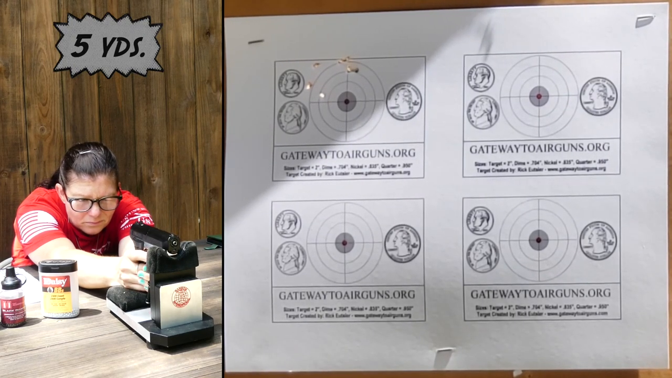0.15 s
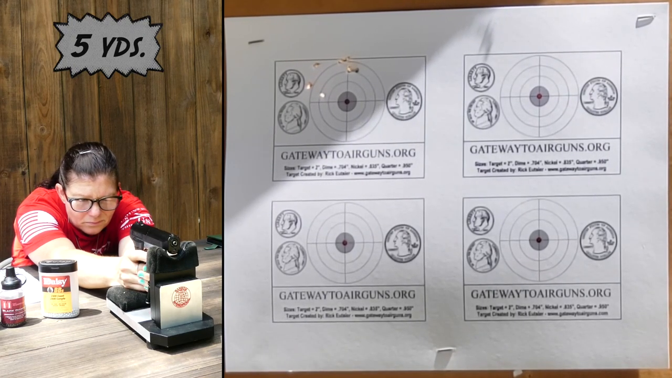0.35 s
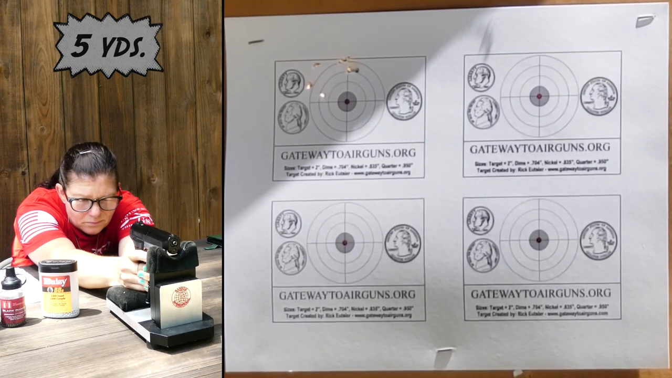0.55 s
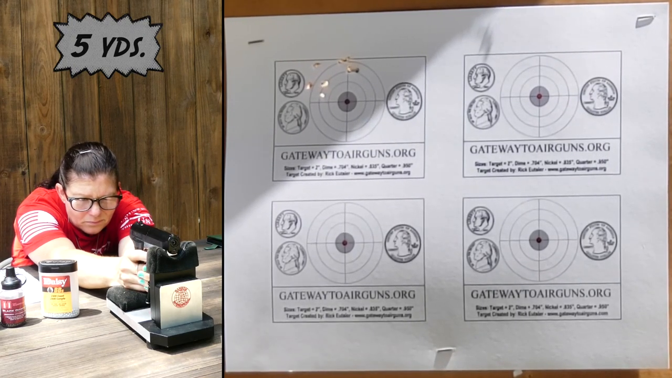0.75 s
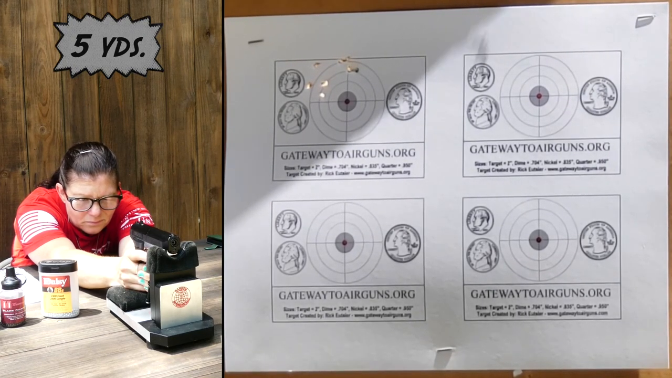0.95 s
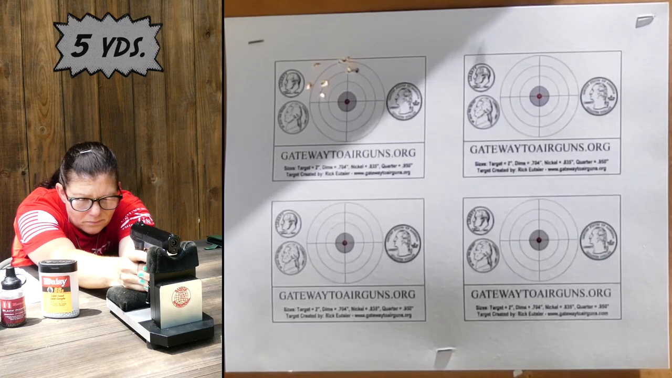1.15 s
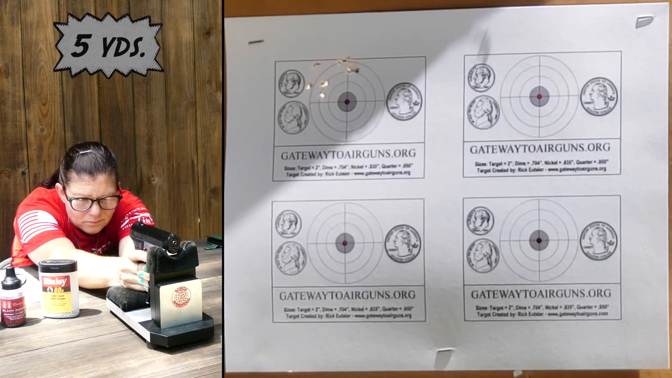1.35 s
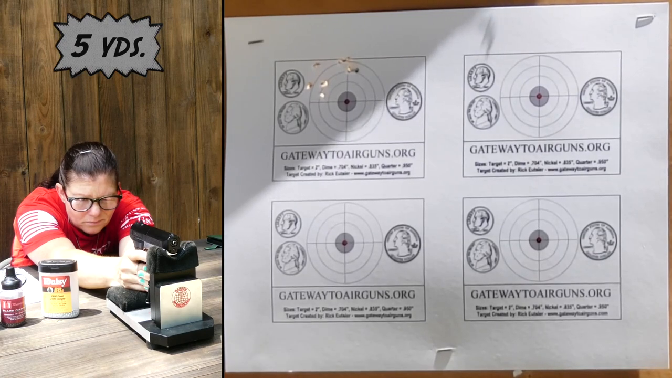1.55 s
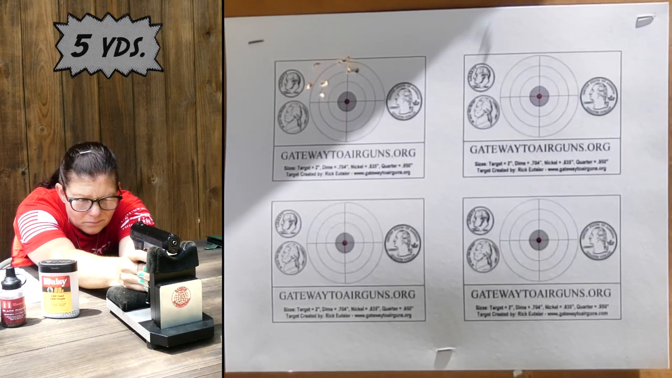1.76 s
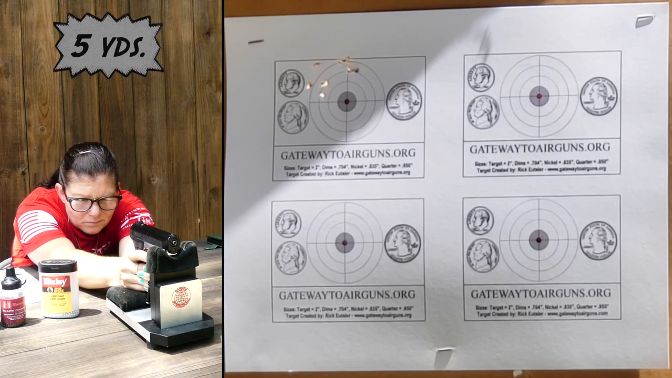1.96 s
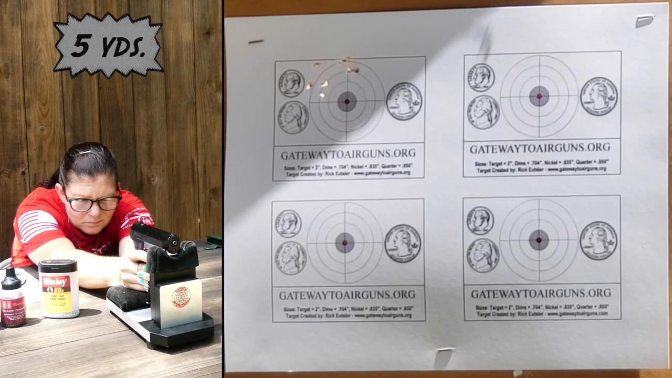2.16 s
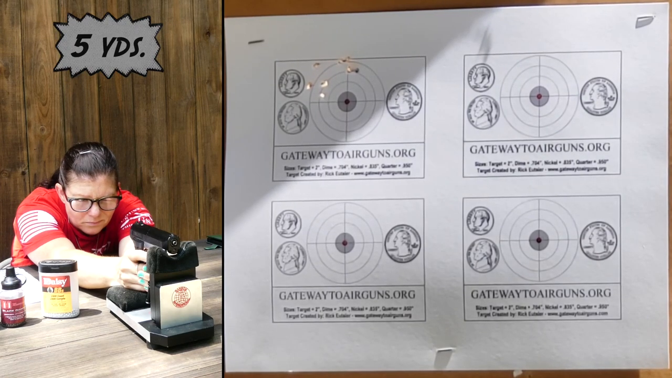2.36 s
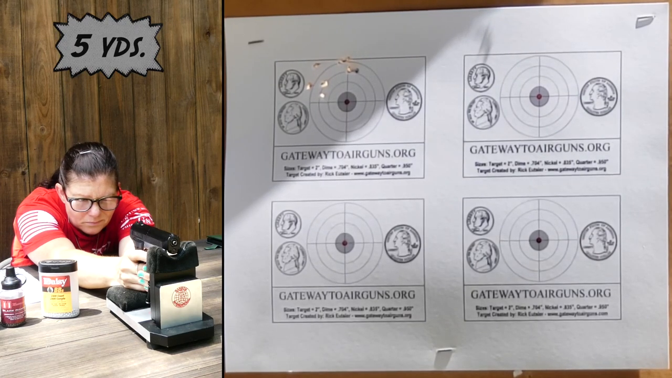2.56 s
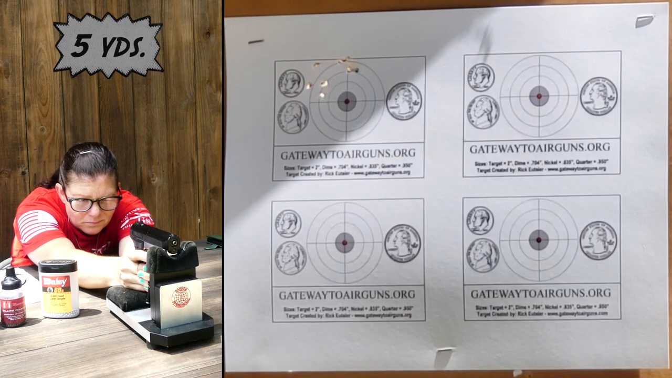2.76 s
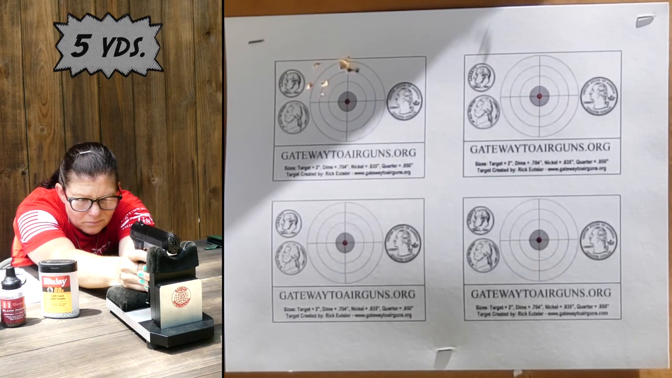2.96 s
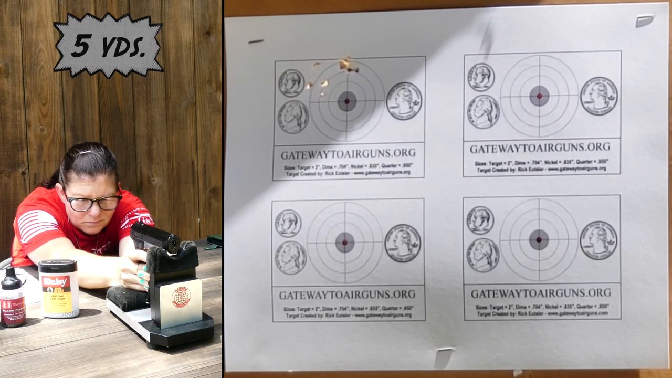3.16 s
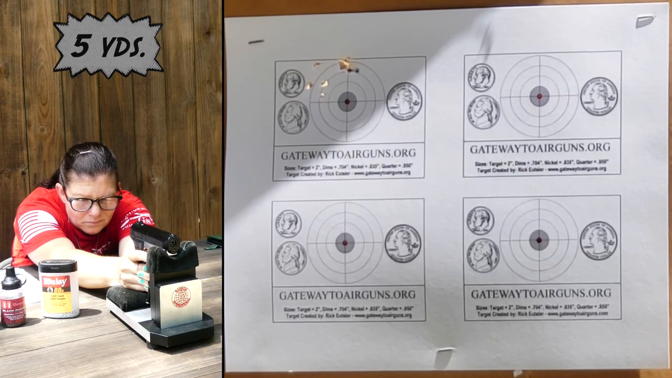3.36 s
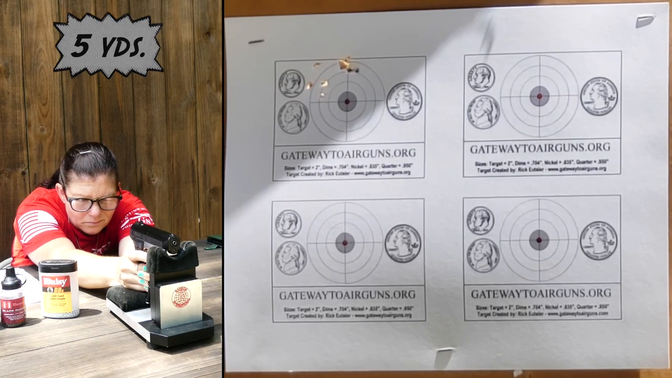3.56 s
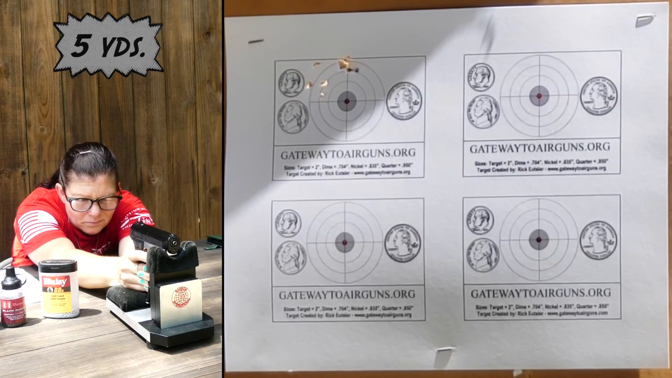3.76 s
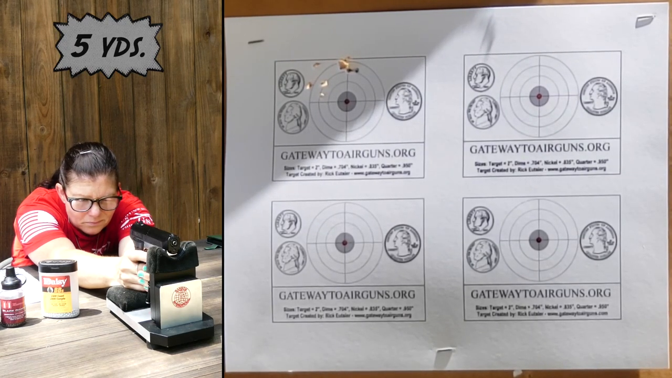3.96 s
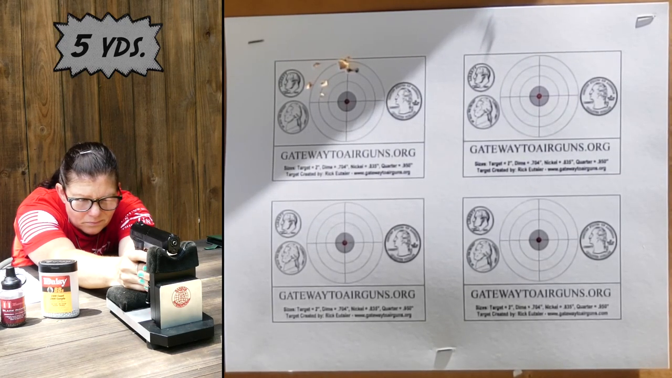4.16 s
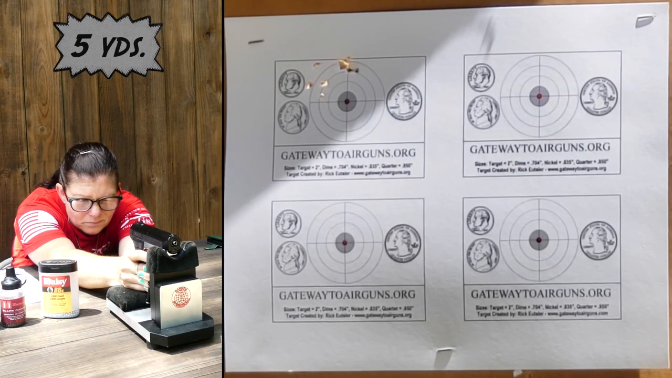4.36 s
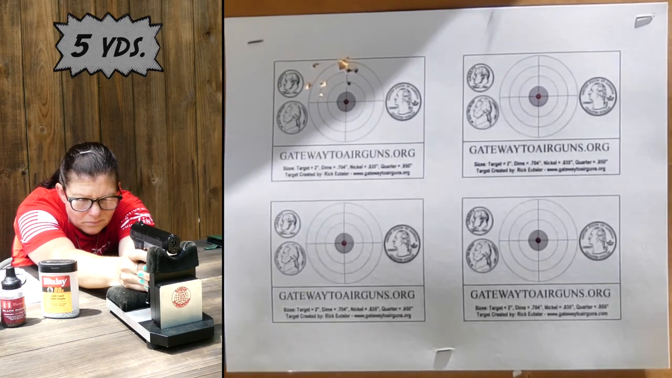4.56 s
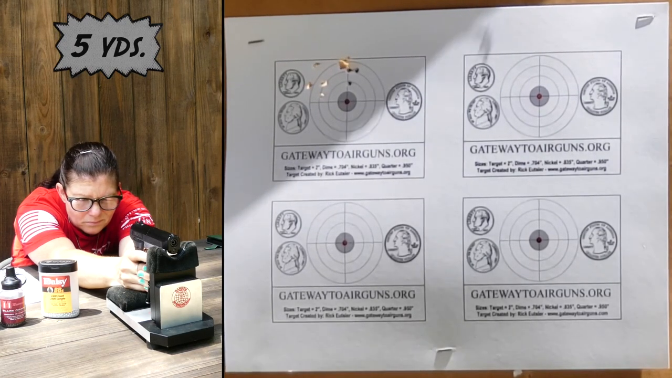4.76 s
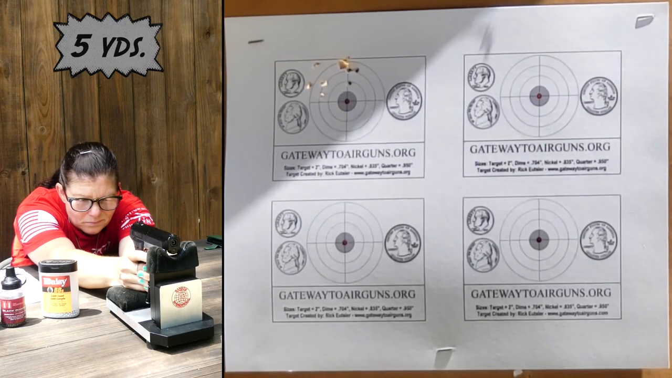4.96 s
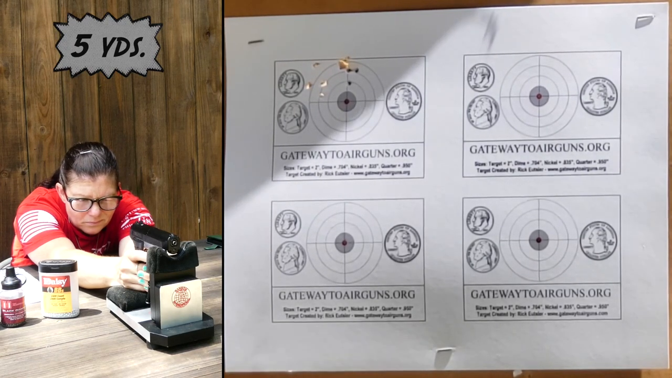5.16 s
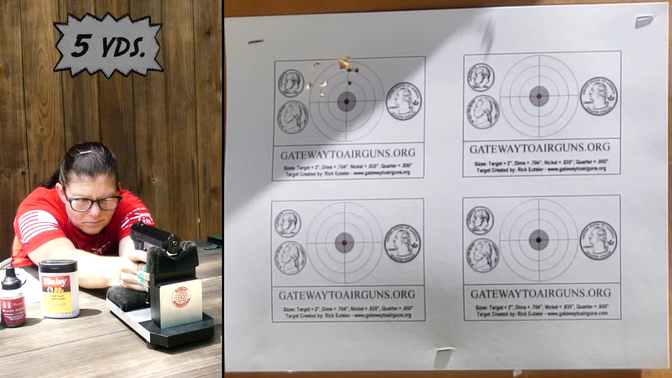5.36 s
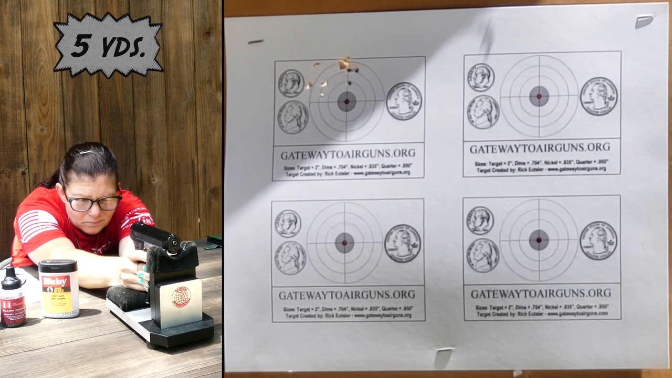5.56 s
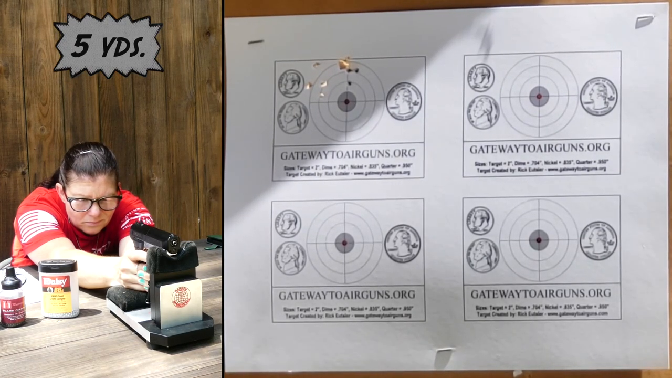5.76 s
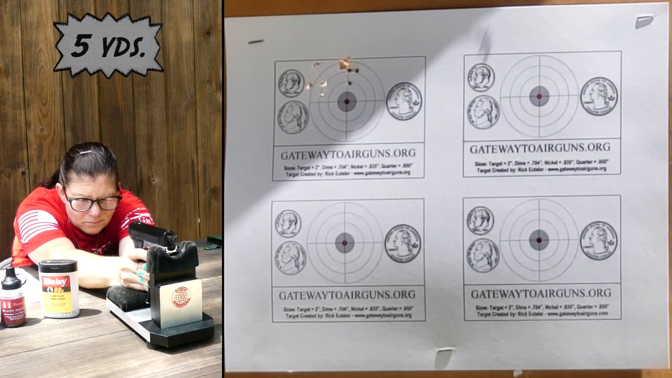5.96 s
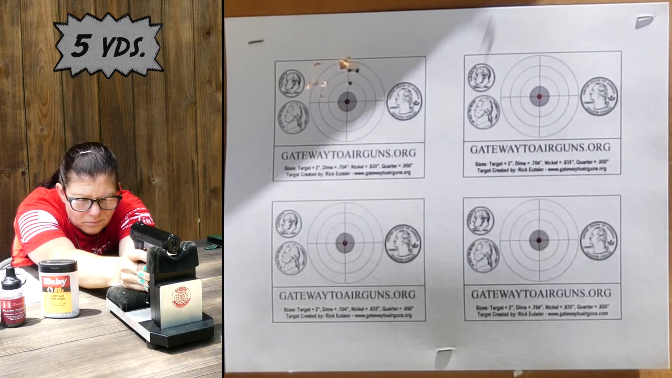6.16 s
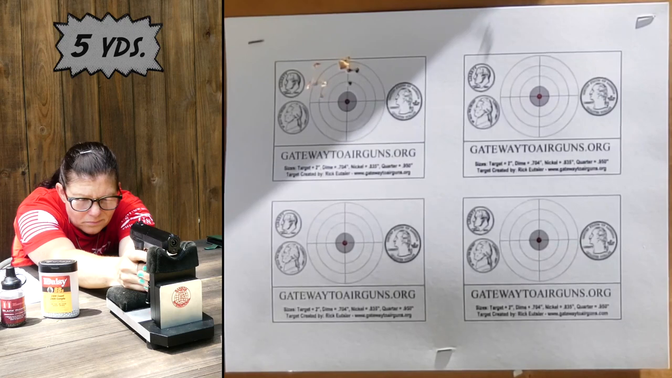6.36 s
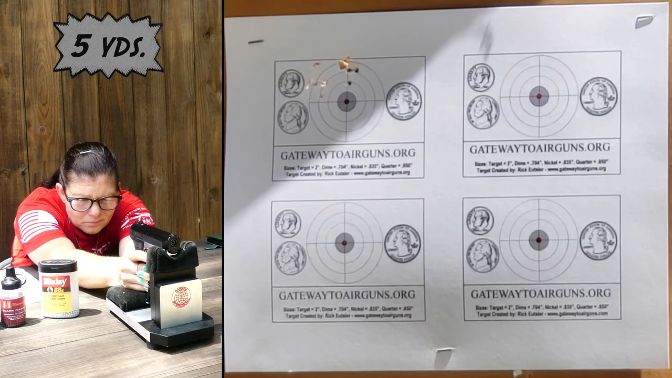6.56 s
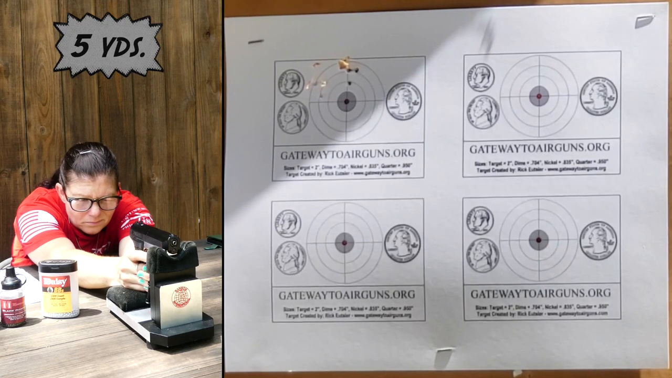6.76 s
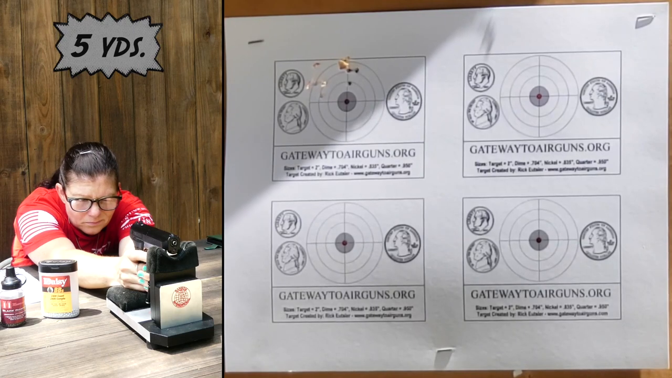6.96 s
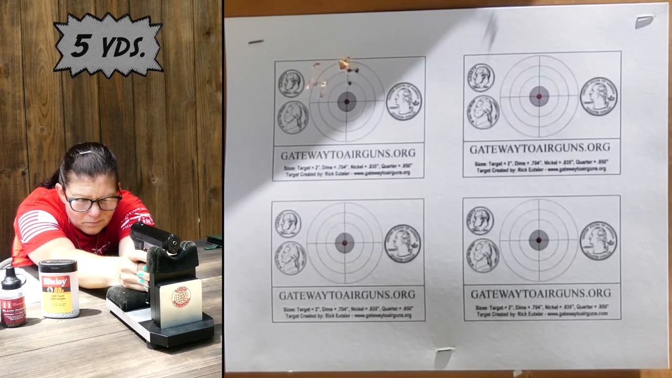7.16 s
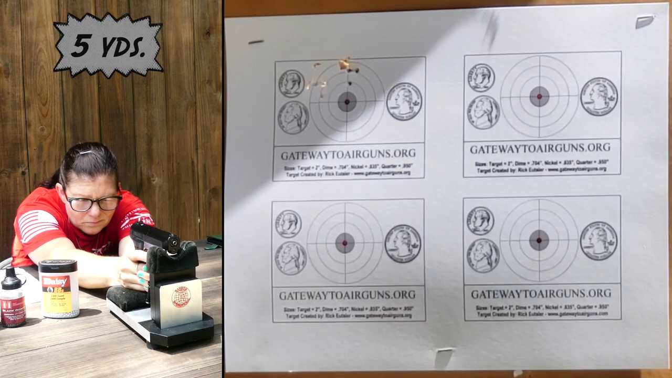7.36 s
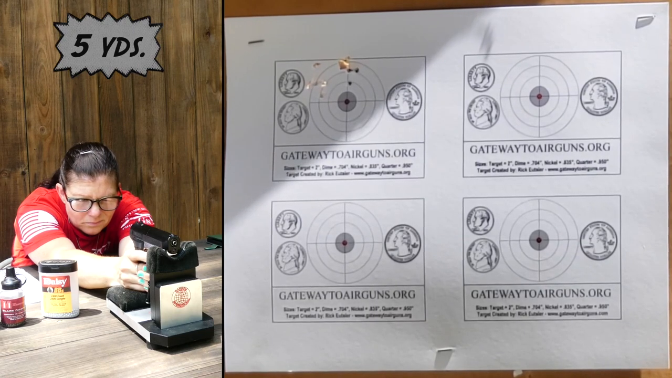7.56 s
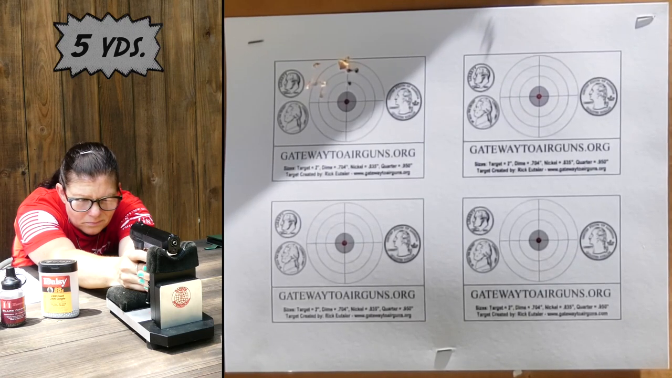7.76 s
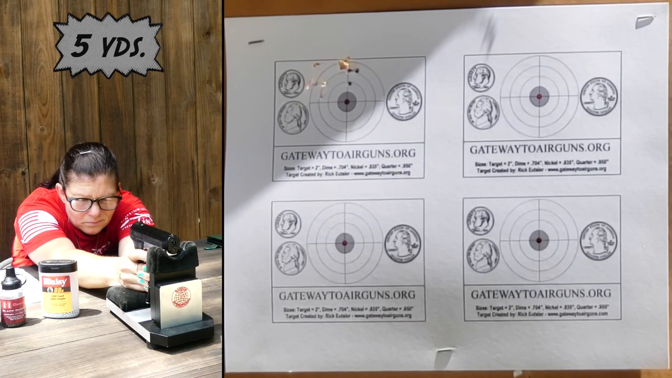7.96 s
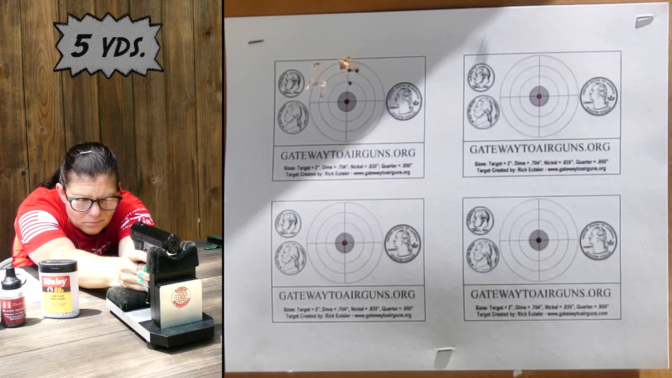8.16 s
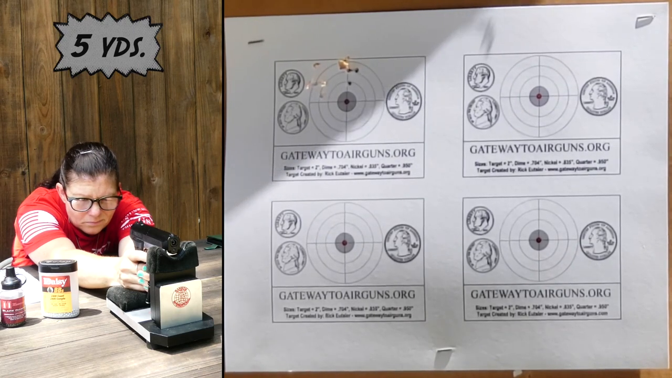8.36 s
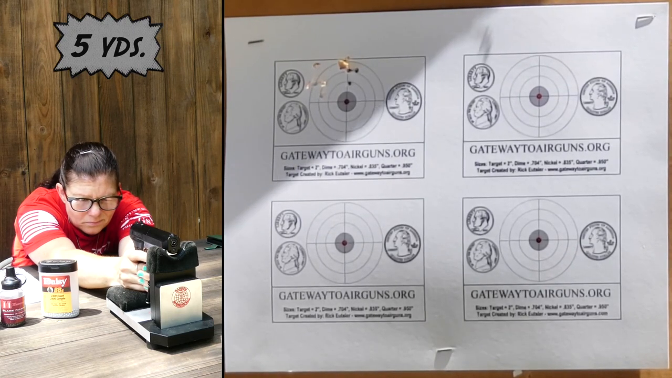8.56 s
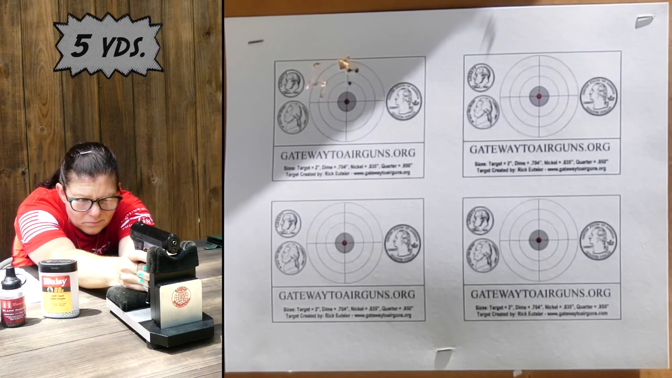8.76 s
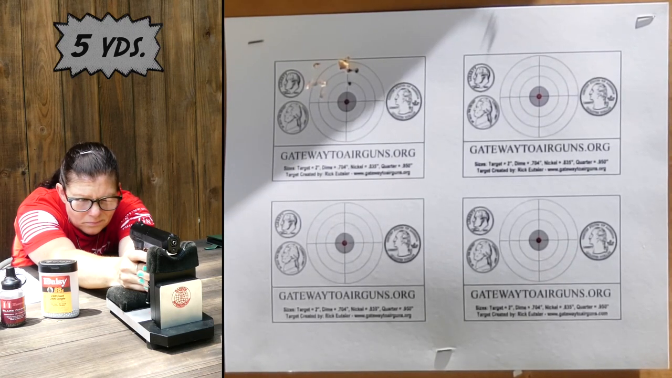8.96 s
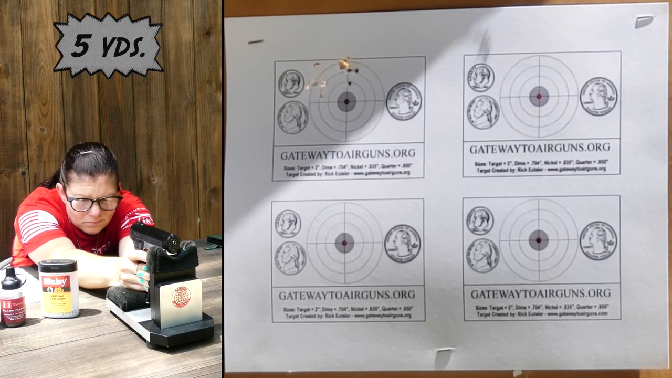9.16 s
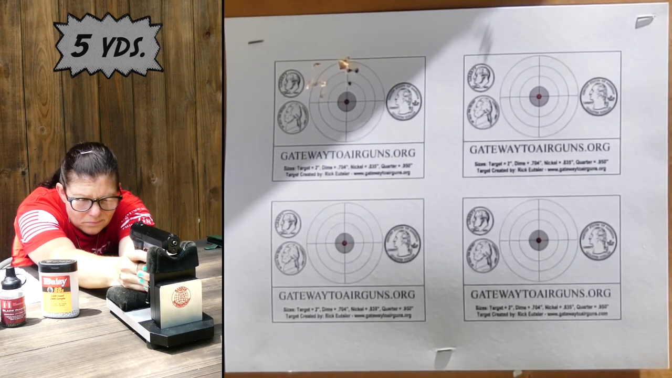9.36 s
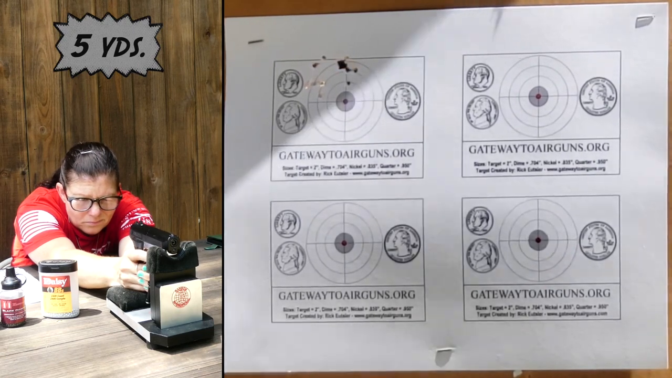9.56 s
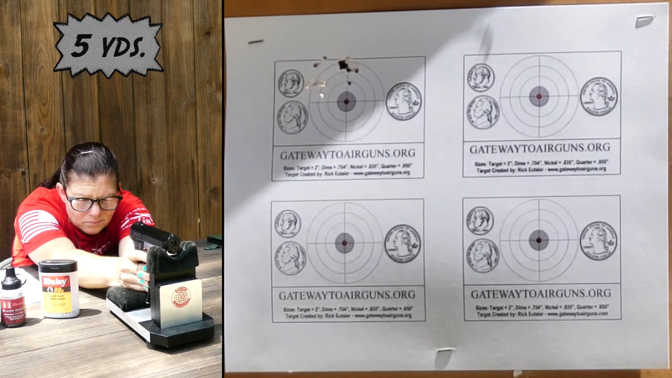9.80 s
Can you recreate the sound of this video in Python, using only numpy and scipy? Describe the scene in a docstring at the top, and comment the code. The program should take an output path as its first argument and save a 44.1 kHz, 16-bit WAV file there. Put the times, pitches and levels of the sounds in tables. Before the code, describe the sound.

Close microphones catch a semi-automatic air pistol firing six times. Every hard pop has a low thump just before it, a puff of gas hiss and a brief scattered yard echo. The ball knocks on box panels and sometimes rolls softly. Between shots come dry mechanical clacks and tiny trigger ticks, with quiet chirping birds, a thin steady insect buzz and low outdoor murmur behind.

```python
"""A gas pistol fires six times in a fenced yard, on two mixed microphones: modes crack and thud, noise hisses.
One microphone overloads with a thump, takes the crack, echoes and yard, and turns itself down after each shot;
the other catches trigger and action as noisy contacts filtered by metal resonances.
The ball knocks on ringing panels and rolls as rumbling noise in the target box.
Gliding sines make birds, a pulsed narrow buzz an insect, shaped noise the murmur of the yard."""
import sys
import numpy as np
from scipy import signal
from scipy.fft import rfft, irfft, next_fast_len
from scipy.io import wavfile

SR = 44100
rng = np.random.default_rng(int(sys.argv[2]) if len(sys.argv) > 2 else 0)


def bounce(signal):
    """Save signal as a 16-bit WAV file at the path given by the first command-line argument."""
    frames = np.transpose(np.atleast_2d(signal))
    limited = np.clip(frames, -1, 1)
    pcm = np.round(limited * 32767).astype(np.int16)
    wavfile.write(sys.argv[1], SR, pcm)


N = 433503

# Shots: [t/s, strength/dB, ringing tone level/dB]
SHOTS = [(0.6940, 0.5, 1.5), (2.9204, 0.5, 2), (4.4440, 0.5, 2), (5.9900, 1.5, 0), (7.8744, 1.5, 1.5),
         (9.454, 1, -3)]
# Arrivals of the blast off ground, fence and walls:
# [delay t/s, crack level/dB, thud level/dB, hiss level/dB, hiss t60/s]
ARRIVALS = [(0, -4.5, -7, 3, 0.015), (.0035, -33, -2, -6, 0.014), (.0084, -37, -12.5, -7, 0.04),
            (0.0116, -55, -14.5, -23.5, 0.071), (0.019, -47, -52, -14.5, 0.067),
            (0.033, -32, -34, -31.5, 0.065), (0.043, -25, -27, -21.5, 0.033), (.052, -18, -51, -26, 0.2),
            (0.0665, -17, -51, -9.5, 0.036), (0.074, -14, -50, -31, 0.24)]
# Modes of the crack: [f/Hz, level/dB, t60/s]
CRACK_MODES = [(1596, 5.5, 0.011), (2700, -22, 0.0047), (6860, -26, 0.0074)]
# Modes of the thud: [f/Hz, level/dB, t60/s]
THUD_MODES = [(320, -2, 0.011), (496, -8.5, 0.045)]
# Relative spectrum of the gas hiss: [f/Hz, level/dB per Hz]
HISS = [(180, -19), (300, -6), (562, -6), (781, -4), (1460, 2), (3010, -1), (6290, -11), (7020, -7.5),
        (11600, -17), (12800, -4)]
# Tones that swell and die within the blast: [delay t/s, f/Hz, level/dB, swell t/s]
RINGS = [(0.0185, 1444, -14.5, 0.0044), (0.0675, 1476, -25.5, 0.0051), (.048, 600, -26.5, 0.0038),
         (0.015, 6730, -22, 0.0026)]
# Relative spectrum of the yard's long answer: [f/Hz, level/dB per Hz]
TAIL = [(100, 17.5), (156, -4), (507, 2), (673, -7.5), (1030, 0.5), (2900, -2), (5200, -6), (9790, -13.5),
        (11800, -27), (12800, -60)]
# Decay of that answer before its far edge: [f/Hz, t60/s]
TAIL_T60 = [(100, 0.94), (500, 2.25), (2000, 7.9), (5000, 2.22), (12000, 1.4)]
# Low boom that swells after the blast: [f/Hz, level/dB, t60/s]
BOOM = [(47.8, -25, 0.67), (82.8, -26, 0.34)]
# Resonances of the action: [f/Hz, width/Hz of one filter pass, level/dB]
ACTION = [(1474, 350, -4), (1913, 680, 5.5), (2380, 710, -16), (2990, 430, 0), (3747, 610, 3),
          (5030, 2600, -1.5), (5950, 330, 1), (6180, 1040, -3), (8560, 2000, -8), (11100, 3800, -6.5),
          (780, 1140, -15.5)]
# Trigger lets go, tick then strike: [strike t/s, strike level/dB, tick ahead t/s, tick level/dB]
RELEASES = [(0.6527, -2.5, 0.0048, -16), (2.873, -0.5, 0.012, -15.5), (4.406, -5, 0.015, -10),
            (5.9392, -3, 0.017, -12.5), (7.8236, -5.5, 0.0165, -14), (9.408, -6, 0.019, -11.5)]
# Trigger springs back, tick, clack, bounce: [clack t/s, clack level/dB, tick ahead t/s, bounce after t/s]
RESETS = [(1.0435, -2.5, 0.0073, 0.015), (3.2826, -1, 0.0082, 0.015), (4.8127, -2, 0.0101, 0.0167),
          (6.338, -3, .0118, .0206), (8.2411, -1, 0.013, 0.023)]
# Small clicks while the trigger is drawn back: [t/s, level/dB, treble level/dB]
TAKE_UP = [(1.249, -28, -13), (1.3069, -21, -42), (1.347, -27, -18), (1.361, -25.5, -8),
           (1.461, -25.5, -14), (1.567, -22.5, -1), (1.7663, -21.5, -8), (3.457, -31.5, -17),
           (3.471, -25.5, -19), (3.52, -21.5, -41), (3.528, -31, -18), (3.563, -30, -30),
           (3.575, -24.5, -9), (3.696, -22.5, -8), (4.9798, -25.5, -13), (5.064, -29, -33),
           (5.073, -31, -30), (5.118, -23, -17), (5.126, -24, -11), (5.167, -23.5, -11), (5.181, -26, -15),
           (5.21, -15, -10.5), (5.277, -33, -19), (5.307, -35, 0), (6.5731, -29, -33), (6.676, -20.5, -20),
           (6.742, -25.5, 13.5), (7.015, -32.5, 7), (6.9021, -12, -13.5), (8.467, -31, -30),
           (8.4798, -24.5, -9), (8.57, -24, -30), (8.5764, -24, -45), (8.582, -28, -30), (8.626, -32, -20),
           (8.6832, -32, -35), (8.805, -13.5, -11.5)]
# Ball against the target box: [t/s, strength level/dB, hollow note level/dB relative to strength]
KNOCKS = [(0.8008, -15.5, -49), (0.81, -18.5, -43), (3.125, -33, -3.5), (3.141, -26, -15),
          (3.158, -28, -12), (3.192, -23.5, 1), (4.5485, -17, -31), (6.081, -14, -45), (6.119, -27, -34),
          (6.748, -18.5, -22), (6.762, -18.5, -33), (6.81, -22, -5), (8.0149, -16.5, -50),
          (8.052, -24, -37), (9.496, -15.5, -35), (9.55, -13, -31), (9.584, -28, -22)]
# Panel modes of the box: [f/Hz, level/dB, t60/s]
BOX = [(496, -10, 0.089), (583, -7, 0.045), (680, -10.5, .03), (960, -14, 0.017), (1480, -3, 0.011),
       (2270, -9, 0.01)]
# Ball rolling in the box: [loudest t/s, level/dB, swell t/s, fade t/s]
ROLLS = [(3.58, -45.5, 0.49, 0.46), (7.02, -44, 0.5, 0.54), (8.9, -55, 0.55, 0.59), (9.8, -54, 0.28, .4)]
# Relative spectrum of the rolling rumble: [f/Hz, level/dB per Hz]
RUMBLE_COLOUR = [(120, -4.5), (260, 7), (360, -1), (520, 10), (680, 0.5), (1000, -2), (1500, -24)]
# Relative spectrum of the yard murmur: [f/Hz, level/dB per Hz]
YARD = [(12, -33), (20, 6.5), (86, -2), (188, -11), (498, -10), (789, -15.5), (1640, -18.5), (2590, -23.5),
        (3780, -26.5), (7230, -33), (9000, -36.5), (11400, -40), (12800, -21.5)]
# Bird phrase, a list of points for each of four notes: [t/s, f/Hz, level/dB]
PHRASE = [
    [(-.04, 1699, -18), (-.022, 1780, -12), (-.01, 2228, 1.5), (0, 2408, 3.5), (.012, 2160, 0),
     (.025, 1960, -12)],
    [(.085, 2300, 3), (.1, 2400, -1.5), (.115, 2620, 11)],
    [(.132, 3090, 6), (.143, 2688, 4), (.165, 3170, 0.5), (.195, 2600, -3)],
    [(.052, 3800, -1), (.075, 2930, -3)],
]
# Phrases sung: [t/s, level/dB, first note pitch factor, first note level/dB, upper notes level/dB]
SONG = [(1.204, -49.5, 1, -25, 2.5), (1.461, -40.5, 0.99, -3.5, -4), (1.717, -43, 1.06, -1.5, -0.5),
        (1.978, -40, 1.0, -8, -5.5), (2.239, -46, 1.05, -0.5, -7.5), (2.488, -42, 1.06, -5, -7.5),
        (6.595, -50, 1, -25, 5), (6.846, -48, 1, 0, -1), (7.097, -44, 0.96, -5, -4.5),
        (7.35, -45.5, 0.93, -2.5, 1.5), (7.597, -45.5, 0.98, -3, -3)]
# Far whistles of other birds: [t/s, length/s, first f/Hz, last f/Hz, level/dB]
WHISTLES = [(.03, 0.085, 1690, 1540, -53), (.048, 0.045, 2530, 2400, -55), (.143, 0.08, 2670, 2590, -55),
            (.238, .06, 2640, 2620, -57), (.235, .04, 2190, 2150, -60), (.32, .04, 2650, 2630, -60),
            (.545, .075, 2160, 2200, -59), (.555, 0.075, 1400, 1620, -57), (8.83, .21, 4100, 3400, -64)]

THUMP_LEAD_S, THUMP_DB, THUMP_FALL_S, THUMP_REBOUND_S = .0568, -4, .0027, .0051
SAME_SHARE = .25   # share of hiss power that repeats at every shot
OVERLOAD = .6   # amplitude at which the blast saturates
HAMMER_LEAD_S, HAMMER_DB = .0018, -31
TAIL_DB, TAIL_RISE_S = -25.5, .17
TAIL_EDGE_S, TAIL_EDGE_DB_S = .29, 61.5   # the farthest trees answer last; then echoes thin out faster
PATCHY_DB = 1.2   # the scatterers are unevenly spaced
BOOM_DELAY_S, BOOM_SWELL_S = .0465, .038
DUCK_FROM_DB, DUCK_DEPTH_DB, DUCK_RECOVERY_DB_S, DUCK_EASE_S = -28.5, 3.5, 121, .24
CLICK_DB = -4   # trim on all contact levels
TREBLE_FROM_HZ, TOP_FROM_HZ = 2800, 4500
CONTACT_S, LONGER_DB_PER_DB = .0017, .7   # base scrape time, growth with treble
SCRAPE_DB = 1   # scrape against strike
MODE_SPREAD_DB, PITCH_SPREAD = 2.5, .035   # chance from contact to contact
SNAP_DB_PER_DB = .54   # firm contacts favour the second resonance
TOP_DB_PER_DB = .5   # gentle contacts barely wake the top resonances
RELEASE_TICK_TREBLE_DB, RELEASE_TREBLE_DB = 2, -8
RESET_TICK_DB, RESET_TICK_TREBLE_DB, RESET_TREBLE_DB = -10, -8.5, -14
BOUNCE_DB, BOUNCE_TREBLE_DB = -16, -2.5
STUTTER_DB, STUTTER_S, STUTTER_TREBLE_DB = -36, .012, -18   # faint scrape close to each small click
HOLLOW_HZ, HOLLOW_SWELL_S = 222, .0098
BRIGHTER_DB_PER_DB, FIRM_KNOCK_DB = 2, -16.5   # harder knocks wake the upper modes
RUMBLE_REST_DB, ROLL_SPAN_DB = -54.5, 33   # level between rolls; fall over one swell or fade time
YARD_DB = -48
UPPER_FROM_HZ, UPPER_DIRECT_DB = 2900, -5   # the upper notes come less directly
BIRD_ECHO_DB, BIRD_ECHO_T60_S = -8, 1
INSECT_HZ, INSECT_WIDTH_HZ, INSECT_PULSE_HZ, INSECT_DB = 8310, 160, 78.7, -57.5
CUTOFF_HZ = 13000


def from_db(db):
    """Decibels to amplitude."""
    return 10 ** (np.asarray(db) / 20)


def rms_one(x):
    """Bring a signal to rms 1."""
    return x / np.sqrt(np.mean(x ** 2) + 1e-20)


def at_hz(points, hz):
    """Read a curve along a logarithmic frequency axis."""
    points = np.array(points)
    return np.interp(np.log(hz), np.log(points[:, 0]), points[:, 1])


def coloured(x, spectrum):
    """Noise shaped by a spectrum, rms 1."""
    size = next_fast_len(len(x), real=True)
    hz = np.maximum(np.arange(size // 2 + 1) * SR / size, 1)
    shaped = irfft(rfft(x, size) * from_db(at_hz(spectrum, hz)), size)
    return rms_one(shaped[:len(x)])


def impulses(times, gains, size=N):
    """Unit clicks scaled by gains, over a negligible offset."""
    out = np.full(size, 1e-18)
    np.add.at(out, np.round(np.asarray(times) * SR).astype(int), gains)
    return out


def ring(x, hz, t60):
    """A two-pole resonator: a unit click starts a dying sine of height 1."""
    r, w = from_db(-60 / (t60 * SR)), 2 * np.pi * hz / SR
    return signal.lfilter([0, np.sin(w)], [1, -2 * r * np.cos(w), r * r], x)


def swell(hz, swell_s):
    """A tone that grows for two swell times and dies; height 1."""
    t = np.arange(SR // 5) / SR / swell_s
    return (t / 2) ** 2 * np.exp(2 - t) * np.sin(2 * np.pi * hz * swell_s * t)


def soften(x, length_s):
    """One-pole smoothing: a click becomes a push."""
    r = np.exp(-1 / (max(length_s, 1e-5) * SR))
    return signal.lfilter([1 - r], [1, -r], x)


def add(out, s, sound):
    """Lay a sound into the track at a time in seconds."""
    i = round(s * SR)
    out[i:i + len(sound)] += sound[:N - i]


def drift(rate):
    """Slow chance, rms 1, through random points at a rate per second."""
    knots = rng.standard_normal(int(N / SR * 60) + 2)
    return rms_one(np.interp(np.arange(N) / SR * rate, np.arange(len(knots)), knots))


def air():
    """The murmur of the yard and the rumble of the rolling ball, both wavering noise."""
    t = np.arange(N) / SR
    level = from_db(RUMBLE_REST_DB)
    for s, db, swell_s, fade_s in ROLLS:
        distance = np.where(t < s, (s - t) / swell_s, (t - s) / fade_s)
        level = level + from_db(db - ROLL_SPAN_DB * distance ** 2)
    rumble = level * from_db(1.8 * drift(20.0)) * coloured(rng.standard_normal(N), RUMBLE_COLOUR)
    murmur = from_db(YARD_DB + .8 * drift(3.0)) * coloured(rng.standard_normal(N), YARD)
    return rumble + murmur


def insect():
    """A narrow buzz in quick pulses: a wavering sine with a band of noise around it."""
    turns = np.cumsum(INSECT_PULSE_HZ * (1 + .021 * drift(12.0))) / SR
    pulses = (.72 + .28 * np.cos(2 * np.pi * turns)) * from_db(.8 * drift(30.0))
    tone = np.sin(2 * np.pi * np.cumsum(INSECT_HZ + 35 * drift(22.0)) / SR)
    band = [(INSECT_HZ - 4 * INSECT_WIDTH_HZ, -30), (INSECT_HZ, 0), (INSECT_HZ + 2 * INSECT_WIDTH_HZ, -30)]
    buzz = tone + .8 * coloured(rng.standard_normal(N), band)
    return from_db(INSECT_DB) * rms_one(pulses * buzz)


def whistle(note, start=0, db=0, pitch=1):
    """One gliding sine with soft ends and a slight level flutter; returns its start time and sound."""
    s, hz, level_db = np.transpose(note)
    t = np.arange(s[0], s[-1], 1 / SR)
    ends = np.minimum(1, np.minimum(t - s[0], s[-1] - t) / .007)
    knots = np.arange(s[0], s[-1], .008)
    flutter_db = np.interp(t, knots, rng.normal(0, 4, len(knots)))
    tone = np.sin(2 * np.pi * np.cumsum(pitch * np.interp(t, s, hz)) / SR)
    return start + s[0], ends * from_db(db + np.interp(t, s, level_db) + flutter_db) * tone


def birds():
    """A repeated phrase and some far whistles, smeared by echoes among trees."""
    to_trees, direct = np.zeros((2, N))
    for s, phrase_db, pitch, first_db, upper_db in SONG:
        for note in PHRASE:
            upper = note[0][1] > UPPER_FROM_HZ
            first = note is PHRASE[0]
            note_db = phrase_db + first_db * first + upper_db * upper + rng.normal(0, 1)
            at, tone = whistle(note, s, note_db, pitch if first else 1)
            add(to_trees, at, tone)
            if note is not PHRASE[-1]:     # the highest note arrives only by way of the trees
                add(direct, at, from_db(UPPER_DIRECT_DB * upper) * tone)
    for s, length, first_hz, last_hz, db in WHISTLES:
        at, tone = whistle([(0, first_hz, 0), (length, last_hz, -3)], s, db)
        add(to_trees, at, tone)
        add(direct, at, tone)
    t = np.arange(SR // 2) / SR
    echo = rng.standard_normal(len(t)) * from_db(-60 * t / BIRD_ECHO_T60_S)
    echo = echo / np.sqrt(np.sum(echo ** 2))
    return direct + from_db(BIRD_ECHO_DB) * signal.fftconvolve(to_trees, echo)[:N]


def knocks():
    """The panel modes answer at once, the air inside the box swells after."""
    s, db, hollow_db = np.transpose(KNOCKS)
    out = np.zeros(N)
    for hz, level_db, t60 in BOX:
        bright_db = BRIGHTER_DB_PER_DB * (db - FIRM_KNOCK_DB) * (hz > 1000)
        mode_db = db + level_db + bright_db + rng.normal(0, 3, len(s))
        out += ring(impulses(s, -from_db(mode_db)), hz, t60)
    out = soften(out, .0001)
    # a small panel radiates no bass
    out = signal.sosfilt(signal.butter(2, 300, "high", fs=SR, output="sos"), out)
    for at, level_db in zip(s, db + hollow_db):
        add(out, at, from_db(level_db) * swell(HOLLOW_HZ * rng.normal(1, .021), HOLLOW_SWELL_S))
    return out


def contacts():
    """Every touch of trigger and action as (t/s, level/dB, treble level/dB)."""
    rows = list(TAKE_UP)
    chance = rng.uniform(-1, 1, (len(TAKE_UP), 2))
    for (s, *_), (side, size) in zip(TAKE_UP, chance):
        rows.append((s + STUTTER_S * side, STUTTER_DB + 2 * size, STUTTER_TREBLE_DB))
    for s, db, ahead, tick_db in RELEASES:
        rows.append((s - ahead, tick_db, RELEASE_TICK_TREBLE_DB))
        rows.append((s, db, RELEASE_TREBLE_DB))
    for s, db, ahead, after in RESETS:
        rows.append((s - ahead, RESET_TICK_DB, RESET_TICK_TREBLE_DB))
        rows.append((s, db, RESET_TREBLE_DB))
        rows.append((s + after, BOUNCE_DB, BOUNCE_TREBLE_DB))
    return rows


def clicks():
    """A strike inside a short scratch of noise wakes each resonance of the action with its own strength."""
    s, db, treble_db = np.transpose(contacts())
    out, t = np.zeros(N), np.arange(SR // 30) / SR
    noise = rng.standard_normal((len(s), len(t)))
    mode_chance = rng.standard_normal((len(s), len(ACTION)))
    pitches = 1 + PITCH_SPREAD * rng.standard_normal(len(s))
    # bright contacts scrape for longer
    length = CONTACT_S * from_db(LONGER_DB_PER_DB * np.maximum(treble_db, -2))[:, None]
    bursts = noise * t / length * np.exp(-t / length)
    scrape = bursts / np.sqrt(np.sum(bursts ** 2, axis=1, keepdims=True))
    # gentle contacts scrape more than they strike
    scrape_db = SCRAPE_DB + np.maximum(treble_db, -15 - .4 * db)
    strike = from_db(scrape_db)[:, None] * scrape
    strike[:, SR // 900] += 1     # the low resonances take the strike, the high ones the scrape
    scrape[:, SR // 800] += from_db(db)     # a firm contact has a sharp edge
    sounds = 0
    for k, (hz, width, level_db) in enumerate(ACTION):
        r = np.exp(-np.pi * width / SR)
        b = (1 - r * r) / 2 * np.array([1, 0, -1])
        a = [1, -2 * r * np.cos(2 * np.pi * hz / SR), r * r]
        treble = hz > TREBLE_FROM_HZ
        push = scrape if treble else strike
        gain_db = level_db + treble_db * treble + MODE_SPREAD_DB * mode_chance[:, k]
        gain_db = gain_db + SNAP_DB_PER_DB * db * (k == 1) + TOP_DB_PER_DB * db * (hz > TOP_FROM_HZ)
        resonance = signal.lfilter(b, a, signal.lfilter(b, a, push))
        sounds = sounds - (-1) ** k * from_db(gain_db)[:, None] * resonance     # signs alternate
    for at, peak_db, sound, pitch in zip(s, db, sounds, pitches):
        sound = np.interp(t * pitch, t, sound)
        add(out, at, from_db(peak_db + CLICK_DB) * sound / np.max(np.abs(sound)))
    # table and fence throw back a short blur
    blur = rng.standard_normal(len(t)) * from_db(-60 * t / .071)
    blur = blur / np.sqrt(np.sum(blur ** 2))
    return out + from_db(-13) * signal.fftconvolve(out, blur)[:N]


def yard_tail():
    """Scattered echoes from far off, noise dying band by band, over a low boom."""
    out, t = np.zeros(N), np.arange(SR) / SR
    size = next_fast_len(N, real=True)
    noise = rfft(coloured(rng.standard_normal(size), TAIL))
    hz = np.arange(size // 2 + 1) * SR / size
    edges = 80 * 2.0 ** np.arange(0, 8, .5)     # half-octave bands
    for low, high in zip(edges, edges[1:]):
        fall_db = 60 * t / at_hz(TAIL_T60, np.sqrt(low * high))
        fall_db = fall_db + TAIL_EDGE_DB_S * np.maximum(t - TAIL_EDGE_S, 0)
        shape = from_db(TAIL_DB - fall_db) * -np.expm1(-t / TAIL_RISE_S)
        shape = shape * from_db(PATCHY_DB * drift(45.0)[:SR])     # the same patches after every shot
        envelope = np.zeros(N)
        for s, db, _ in SHOTS:
            add(envelope, s, from_db(db) * shape)
        out += envelope * irfft(noise * ((hz >= low) & (hz < high)), size)[:N]
    for boom_hz, db, t60 in BOOM:
        tone = ring(impulses([0], .89, SR), boom_hz, t60) * -np.expm1(-t / BOOM_SWELL_S)
        for s, *_ in SHOTS:
            add(out, s + BOOM_DELAY_S, from_db(db) * tone)
    return out


def thumps():
    """A sudden drop in pressure that recovers and swings over."""
    out, t = np.zeros(N), np.arange(SR // 10) / SR
    share = THUMP_FALL_S / THUMP_REBOUND_S     # the swing-over cancels the area of the drop
    shape = share * np.exp(-t / THUMP_REBOUND_S) - np.exp(-t / THUMP_FALL_S)
    for s, *_ in SHOTS:
        add(out, s - THUMP_LEAD_S, from_db(THUMP_DB) * soften(shape, .00005) / (1 - share))
    return out


def blasts():
    """Every shot meets the same surfaces; the gas hiss repeats only in part; the microphone overloads."""
    out, size = np.zeros(N), SR // 3
    t = np.arange(size) / SR
    delay, crack_db, thud_db, hiss_db, hiss_t60 = np.transpose(ARRIVALS)
    crack, thud = np.zeros((2, size))
    for hz, db, t60 in CRACK_MODES:
        crack += ring(impulses(delay, from_db(crack_db + db), size), hz, t60)
    for hz, db, t60 in THUD_MODES:
        thud += ring(impulses(delay, from_db(thud_db + db), size), hz, t60)
    tone = np.zeros(size + SR // 5)
    for s, hz, db, swell_s in RINGS:
        add(tone, s, from_db(db) * swell(hz, swell_s))
    after = t - delay[:, None]
    falls = from_db(hiss_db[:, None] - 60 * np.abs(after) / hiss_t60[:, None])
    envelope = soften(np.sum((after >= 0) * falls, axis=0), .0003)
    same = coloured(rng.standard_normal(size), HISS)
    for s, db, tone_db in SHOTS:
        fresh = coloured(rng.standard_normal(size), HISS)
        hiss = np.sqrt(SAME_SHARE) * same + np.sqrt(1 - SAME_SHARE) * fresh
        blast = from_db(db) * (crack + thud + from_db(tone_db) * tone[:size] + envelope * hiss)
        add(out, s - HAMMER_LEAD_S, from_db(HAMMER_DB) * crack[:SR // 250])     # the hammer meets the valve
        add(out, s, OVERLOAD * np.tanh(blast / OVERLOAD))
    return out


def gain_control(loud):
    """Gain eases down on a loud sound, holds while it is far over the mark and eases back."""
    level_db = 10 * np.log10(soften(loud ** 2, .000088) + 1e-12)
    # the level reading jumps up at once and falls at a steady rate
    ramp = DUCK_RECOVERY_DB_S * np.arange(N) / SR
    held_db = np.maximum.accumulate(level_db + ramp) - ramp
    duck_db = np.clip(held_db - DUCK_FROM_DB, 0, DUCK_DEPTH_DB)
    return from_db(-soften(duck_db, DUCK_EASE_S))


def scene():
    """The thump drives the gain control but only the yard sound is turned down by it."""
    thump = thumps()
    yard = blasts() + yard_tail() + air() + birds() + insect()
    turned_down = gain_control(thump + yard) * yard
    return (thump + turned_down + clicks() + knocks())[None, :]


def record(dry):
    """A steep low-pass cuts the top."""
    return signal.sosfilt(signal.cheby2(14, 80, CUTOFF_HZ, fs=SR, output="sos"), dry)


dry = scene()
out = record(dry)
bounce(out)
```